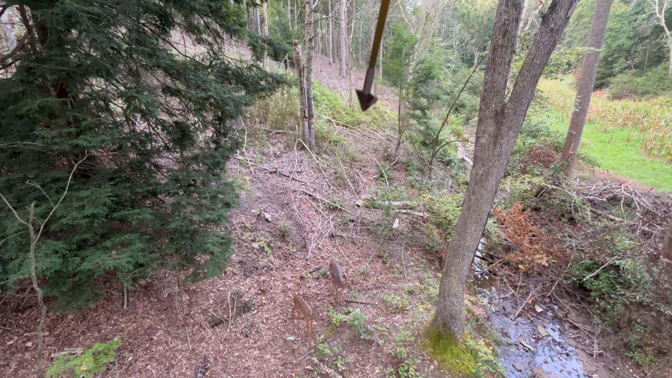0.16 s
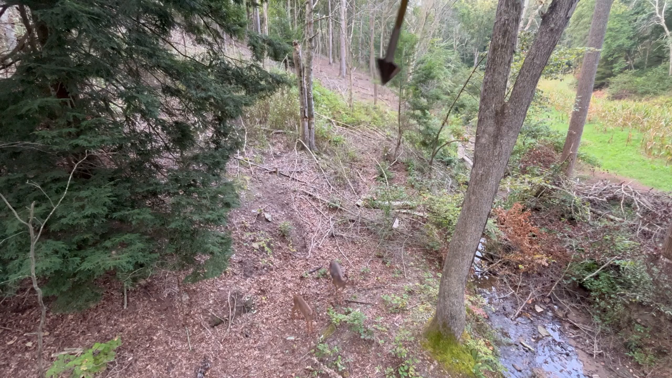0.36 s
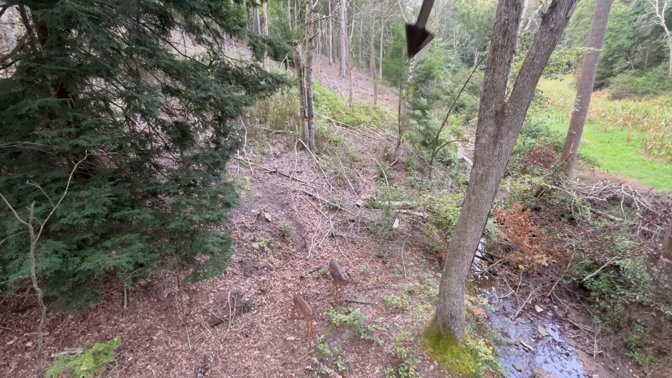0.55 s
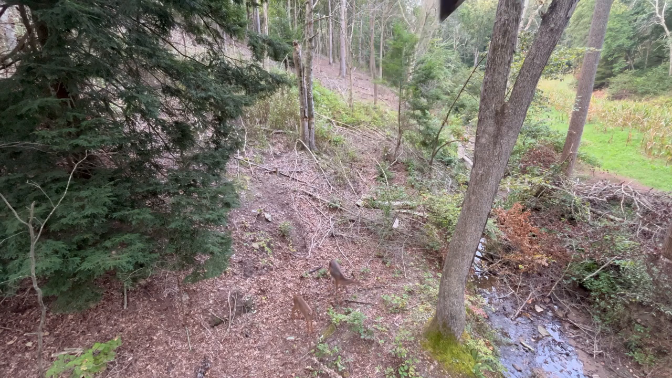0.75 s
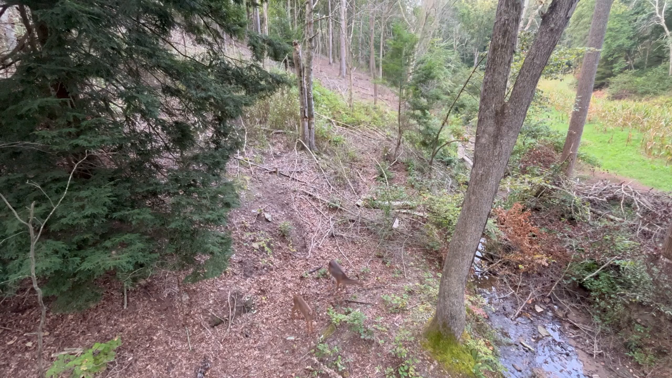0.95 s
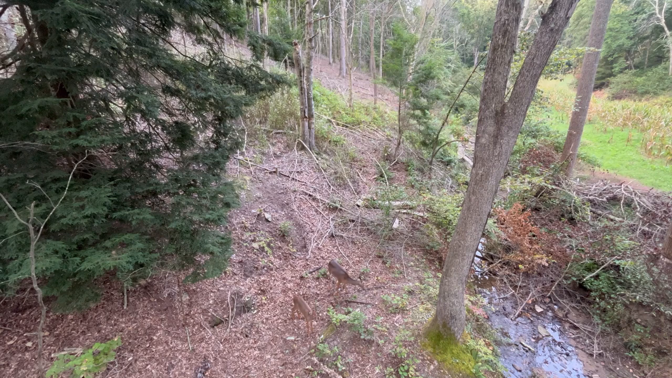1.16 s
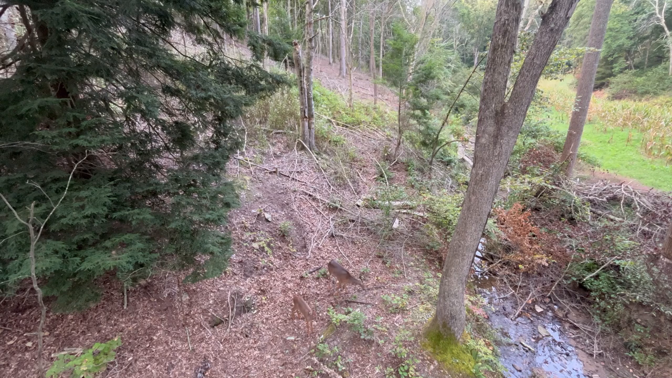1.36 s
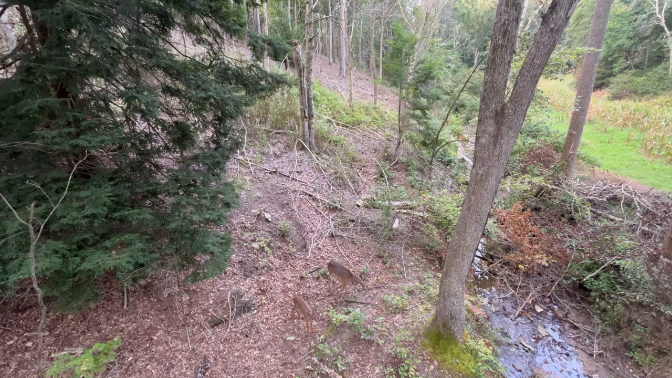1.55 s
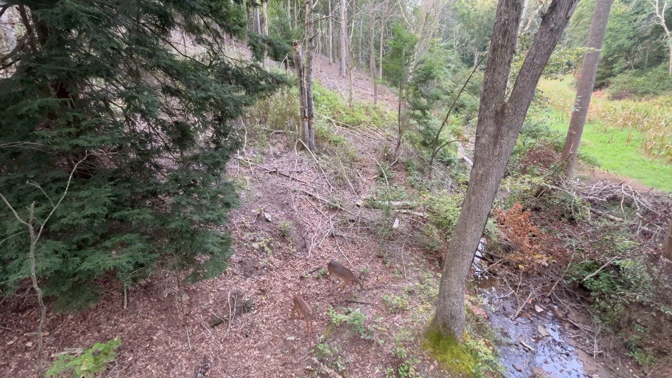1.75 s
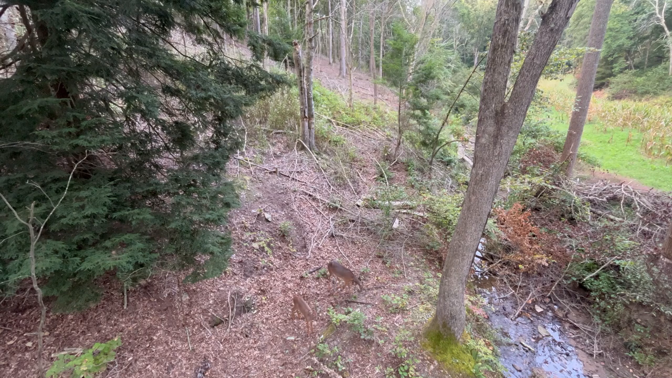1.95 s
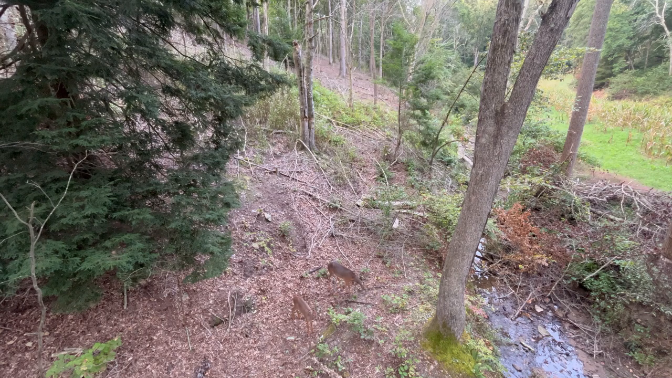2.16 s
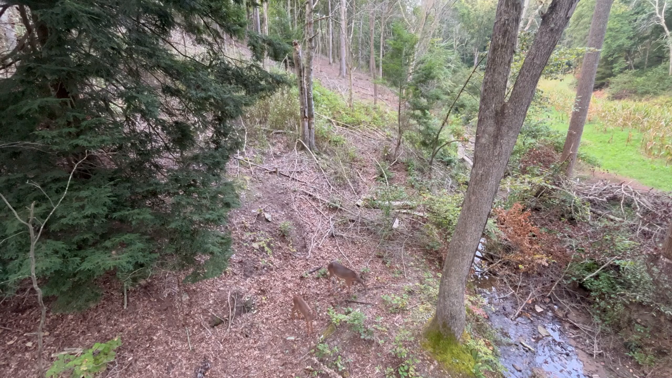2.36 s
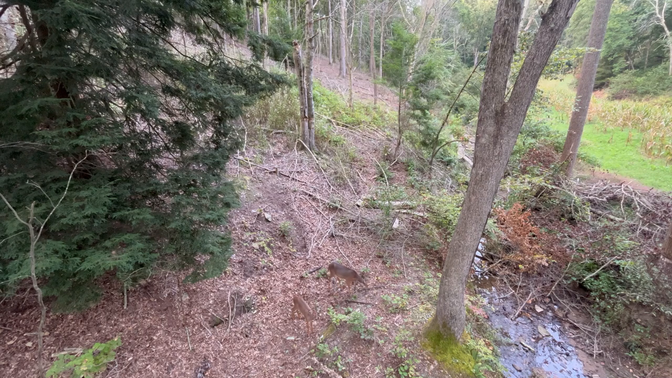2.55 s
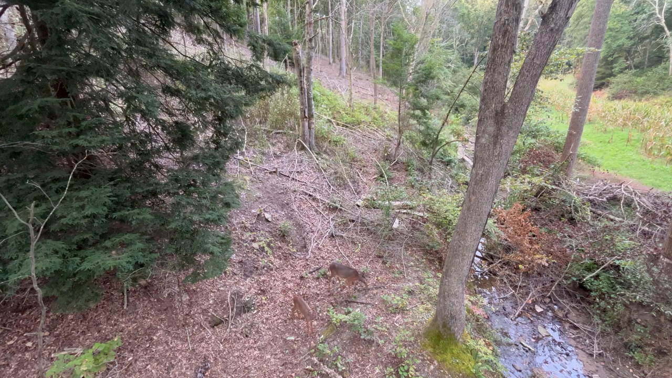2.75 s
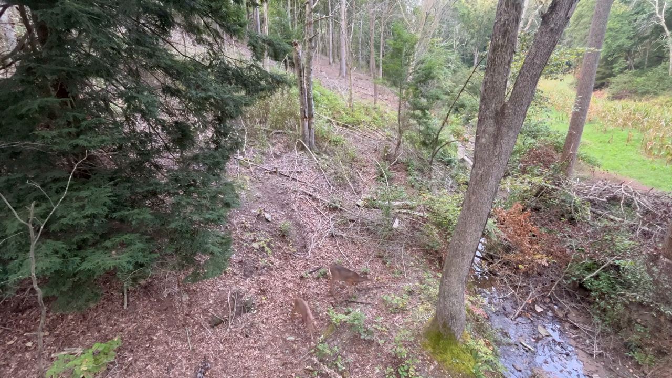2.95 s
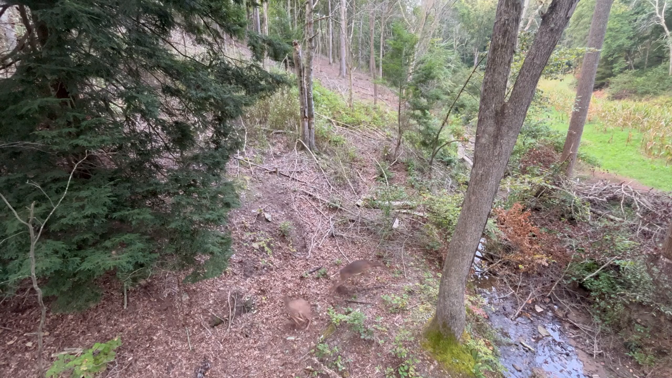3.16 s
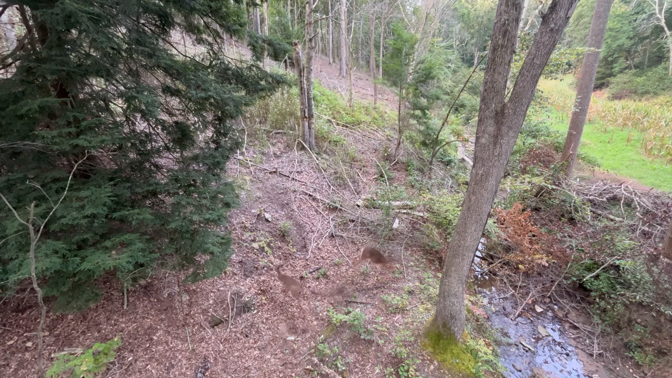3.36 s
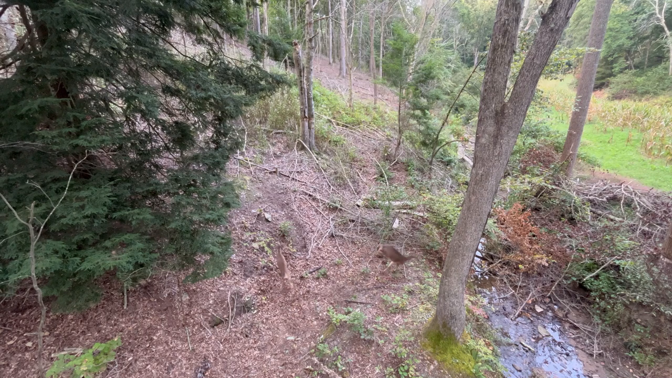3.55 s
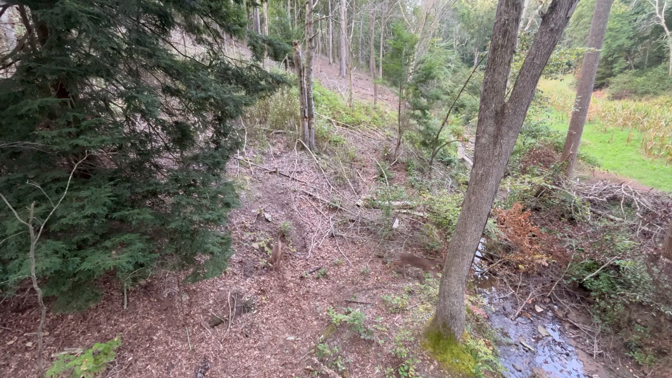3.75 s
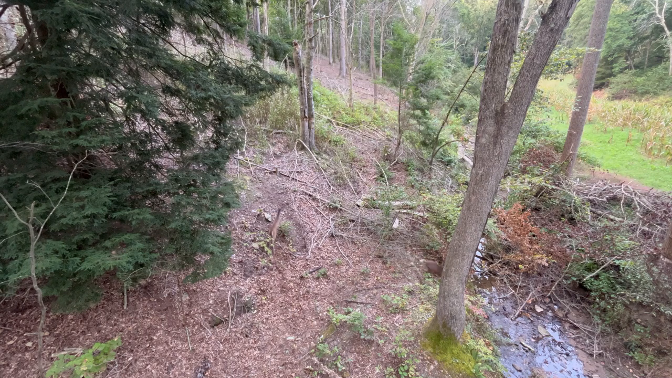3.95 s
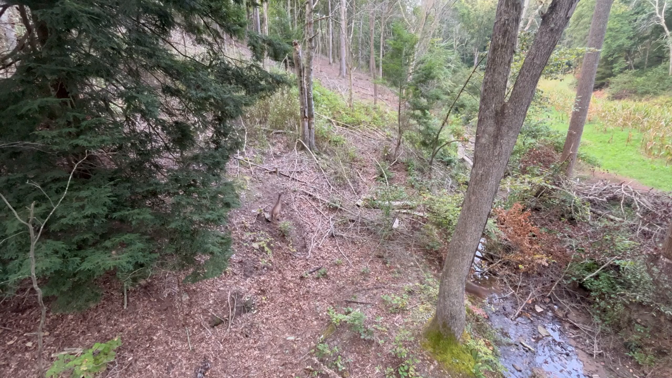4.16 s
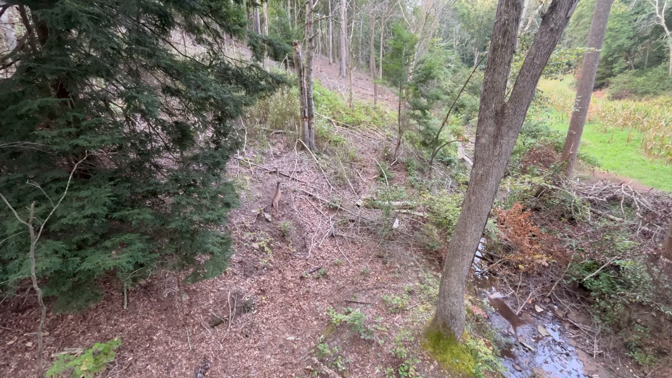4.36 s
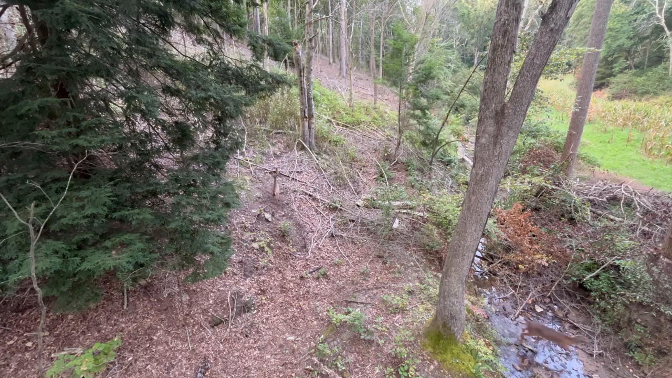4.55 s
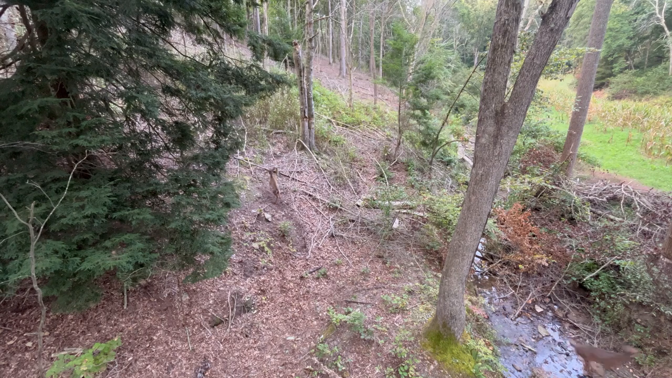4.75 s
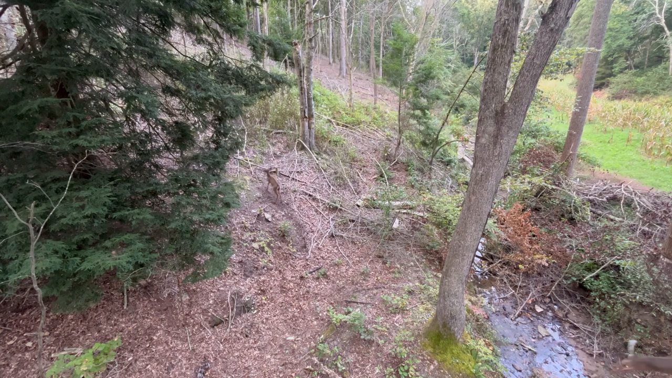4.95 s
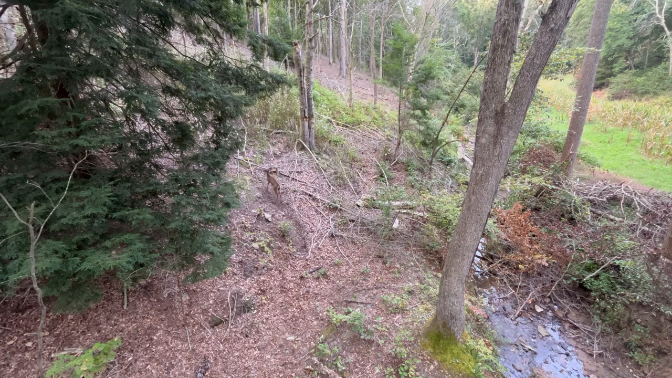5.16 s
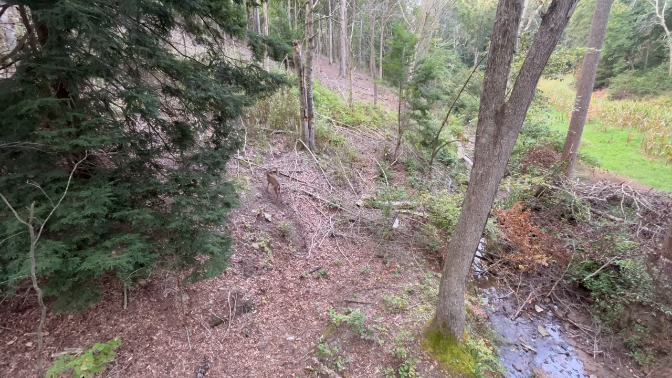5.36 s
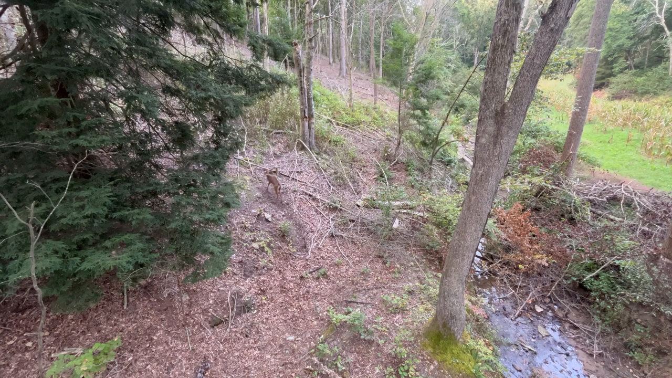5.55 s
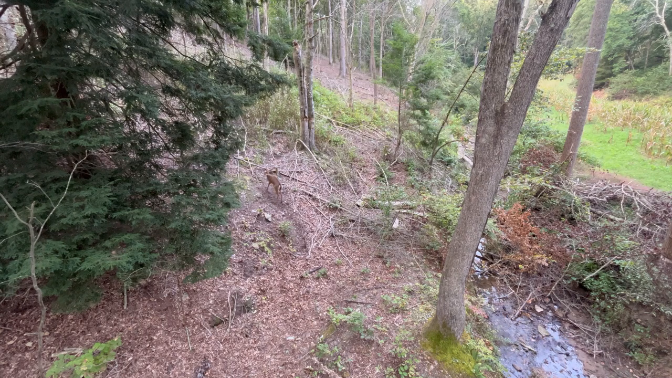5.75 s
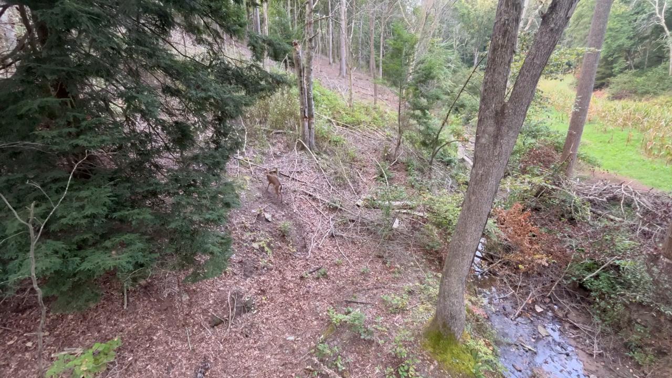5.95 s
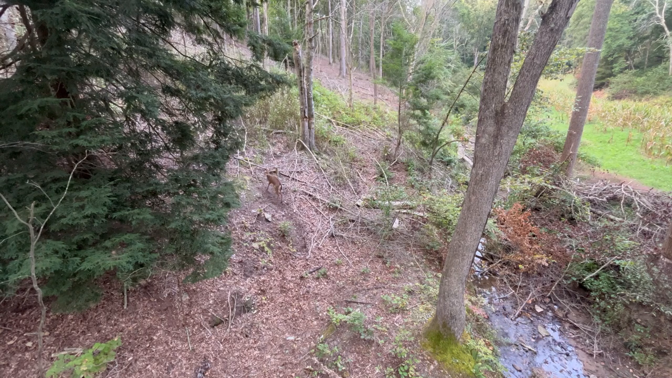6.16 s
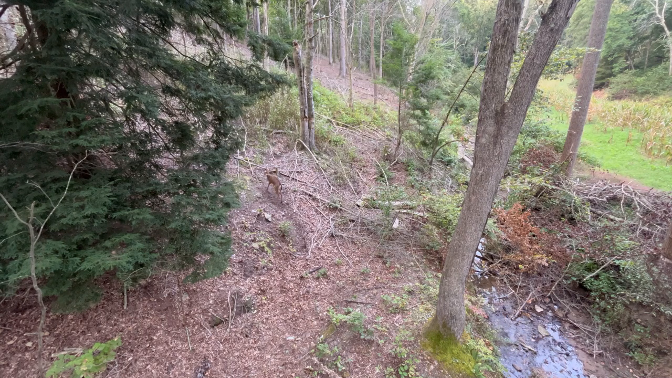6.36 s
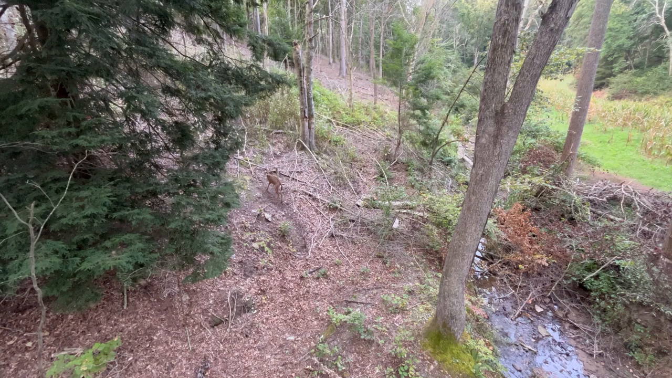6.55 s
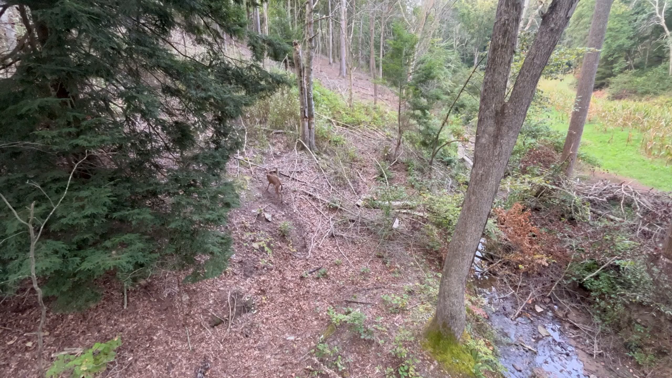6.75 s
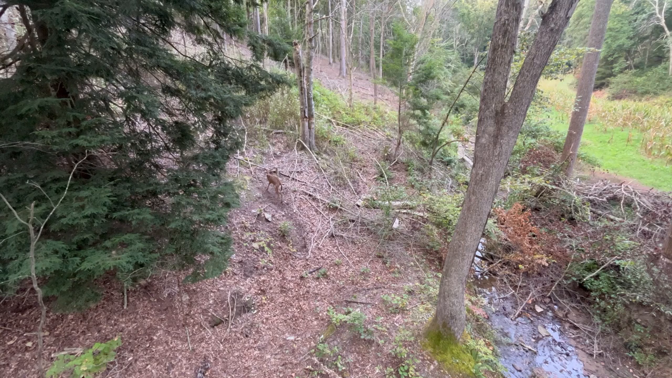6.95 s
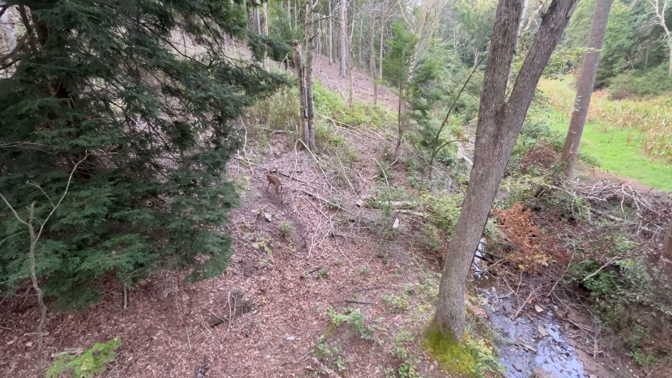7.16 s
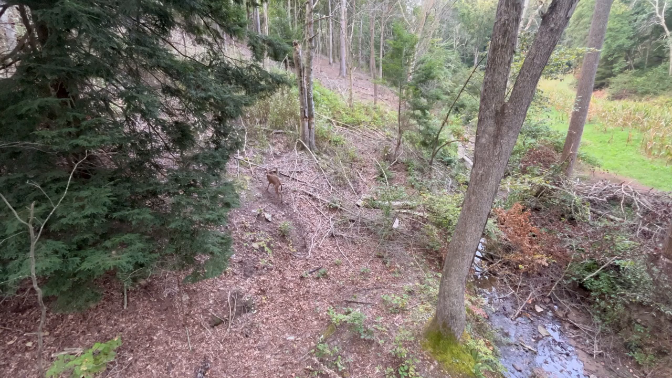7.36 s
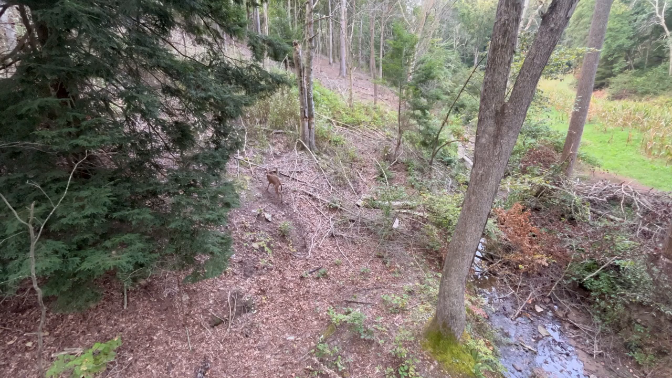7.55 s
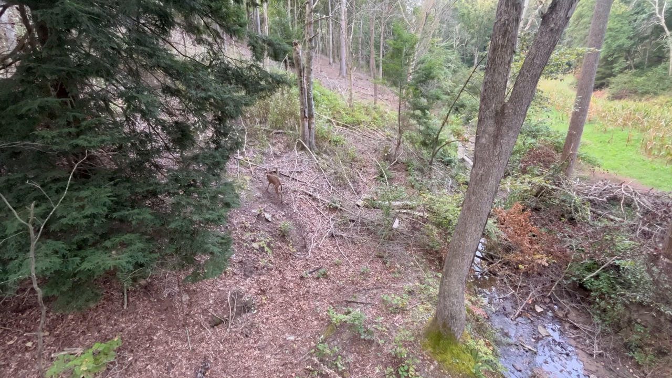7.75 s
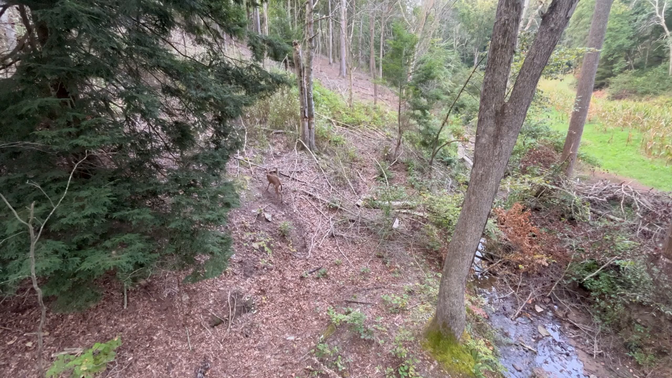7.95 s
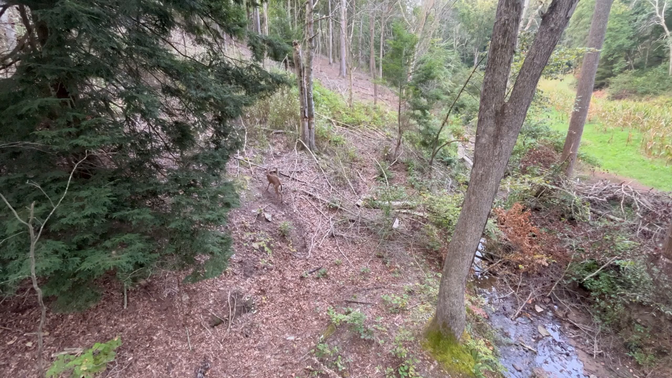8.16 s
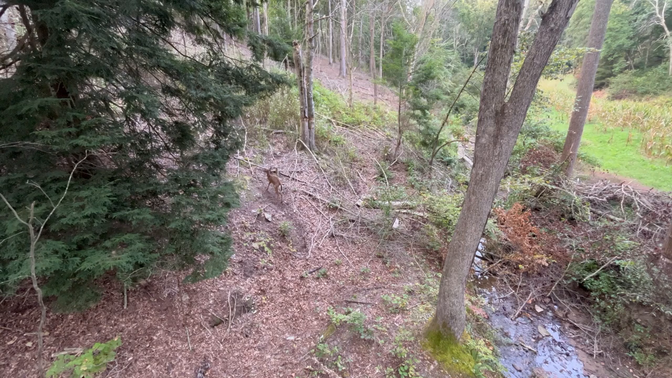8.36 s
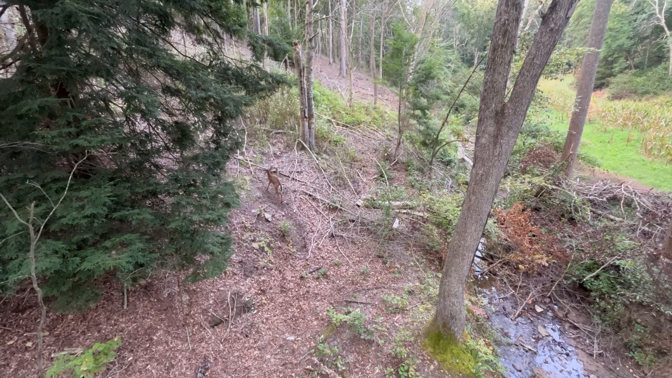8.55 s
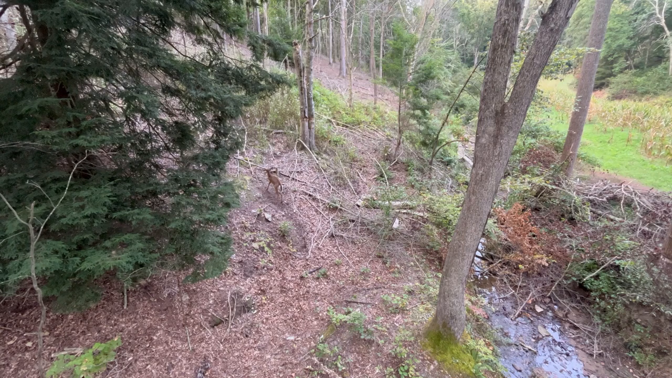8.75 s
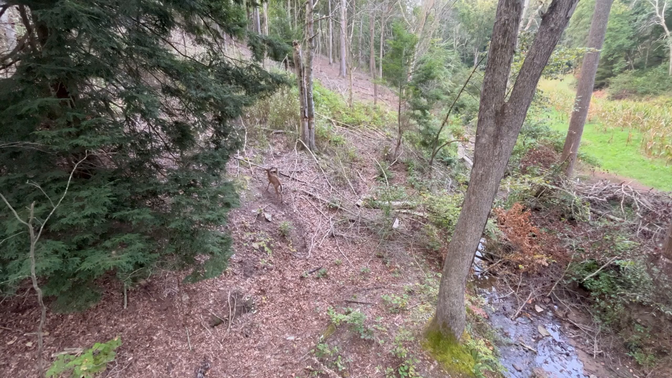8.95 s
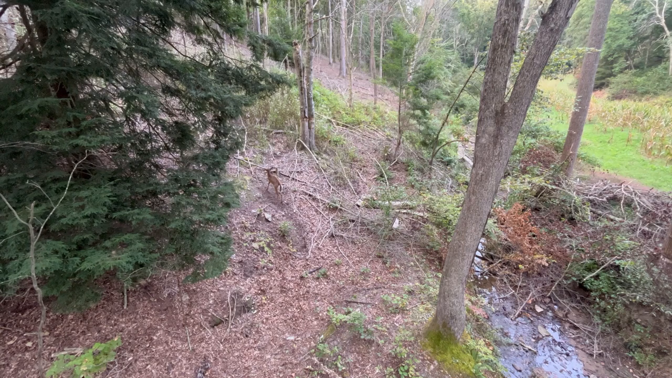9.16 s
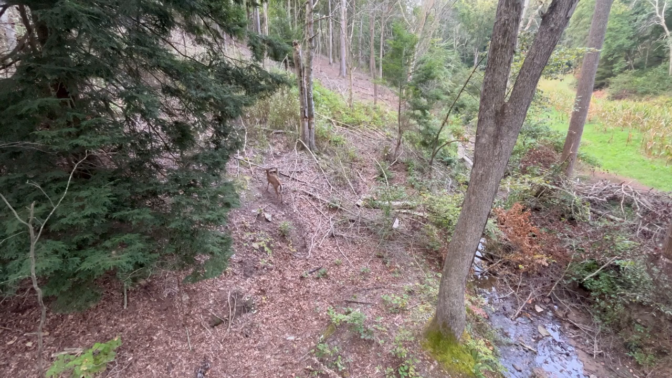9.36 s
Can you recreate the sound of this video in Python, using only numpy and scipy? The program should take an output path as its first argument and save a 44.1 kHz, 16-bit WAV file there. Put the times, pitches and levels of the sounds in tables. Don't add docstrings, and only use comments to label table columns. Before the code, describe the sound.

Open woodland heard from a tree stand, in stereo, with a near cricket's short falling chirps, far crickets trilling continuously and a soft distant hum. In the first 2.5 seconds there are small shuffles and dry ticks near the microphone, plus faint bird notes. At about 2.75 a bow is shot: a very loud, sharp cluster of string slap and hard clacks, loose rattle and a short low thump, over within about 0.15 seconds, with slight woodland echo. From 2.86 to 5.3 a deer bounds away, dull hoof thuds and crisp leaf crunches with bright twig snaps, quick at first, then more spaced and distant. Leaves settle; at about 5.75 to 6.0 it gives one short, airy nasal snort. From 6.3 to the end, at about 9.4, faint irregular steps, twig ticks and soft hollow knocks continue far off under the crickets; a tiny high bird peep comes near 9.35.

```python
import sys
import numpy as np
from scipy import signal
from scipy.fft import rfft, irfft, next_fast_len
from scipy.io import wavfile
from scipy.ndimage import uniform_filter1d, map_coordinates

SR = 44100
rng = np.random.default_rng(int(sys.argv[2]) if len(sys.argv) > 2 else 0)


def unload_wav(signal):
    wavfile.write(
        sys.argv[1],
        SR,
        np.round(np.clip(np.atleast_2d(signal).T, -1, 1) * 32767).astype(np.int16),
    )


def ratio(d):
    e = np.asarray(d, float) / 20
    return 10 ** e


N = 414540


def evened(x):
    return x / np.sqrt(np.mean(x ** 2) + 1e-20)


def read(points, hz):
    f, value = np.transpose(points)
    return np.interp(np.log(hz + 1), np.log(f + 1), value)


def column(rows, index):
    return np.interp(np.arange(N) / SR, np.array(rows)[:, 0], np.array(rows)[:, index])


def add(mix, s, sound):
    part = mix[..., round(s * SR):][..., :sound.shape[-1]]
    part += sound[..., :part.shape[-1]]


def sides(pan_db):
    return ratio(np.array([.5 * pan_db, -.5 * pan_db]))


def colour(x, gain_db):
    size = next_fast_len(N)
    return irfft(rfft(x, size) * ratio(gain_db(np.fft.rfftfreq(size, 1 / SR))), size)[..., :N]


def resonate(x, hz, width):
    turn = np.exp(2j * np.pi * np.cumsum(hz * np.ones(x.shape[-1])) / SR)
    r = np.exp(-np.pi * width / SR)
    return 2 * (turn * signal.lfilter([1 - r], [1, -r], x / turn)).real


def ring(t, hz, t60):
    return np.sin(2 * np.pi * hz * t) * ratio(-60 * t / max(t60, .003))


def crackle(per_s, spread_db, hiss, alike):
    luck = rng.random((3, N)) * SR / per_s
    air = rng.standard_normal((3, N))
    clicks = np.zeros((3, N))
    clicks[luck < 1] = ratio(spread_db * np.minimum(-np.log(luck[luck < 1] + 1e-9), 5))
    x = evened(clicks * np.sign(air[:, ::-1])) + hiss * air
    alike = np.clip(alike, 0, 1)
    return evened(np.sqrt(alike) * x[0] + np.sqrt(1 - alike) * x[1:])


def patchy(x, depth_db):
    z = signal.stft(x, nperseg=256)[2]
    field = uniform_filter1d(uniform_filter1d(rng.standard_normal(z.shape[1:]), 4, 0), 8, 1)
    return evened(signal.istft(z * ratio(depth_db * evened(field)), nperseg=256)[1][:, :N])


# (time [s], peak [dB], pitch [Hz], t60 [s])
SLAPS = [(2.741, -45, 4240, 0.09), (2.747, -38, 2480, .05), (2.7516, -28.5, 1260, .05),
         (2.7567, -11.5, 4060, 0.034), (2.76, -12, 2800, 0.027), (2.764, -6.5, 1180, .02),
         (2.769, -10.5, 3330, .02), (2.774, -10.5, 5100, 0.022), (2.778, -11, 5000, 0.024),
         (2.7872, -8, 3930, 0.02), (2.795, -21.5, 2200, .03), (2.798, -21, 2280, .04),
         (2.806, -19, 3420, .04), (2.817, -25.5, 3400, 0.032), (2.829, -25, 3430, 0.046)]
# (time [s], level [dB], pitch [Hz], t60 [s],
# sign of first swing)
THUMPS = [(2.76, -15, 466, 0.051, -1), (2.764, -22, 840, .04, 1), (2.759, -17.5, 640, 0.054, 1),
          (2.762, -26, 336, .09, 1), (2.78, -12.5, 126.8, 0.021, -1), (2.781, -21.5, 67, 0.05, 1),
          (2.797, -22.5, 449, 0.1, 1), (2.835, -36.5, 455, .08, 1), (2.804, -21, 51, 0.082, -1),
          (2.812, -14, 64, 0.067, 1), (2.831, -29, 92.4, 0.37, 1), (2.8, -46, 2400, 0.29, 1),
          (5.771, -41.5, 185, 0.045, 1), (2.7828, -12.5, 140, .03, 1), (2.8135, -22, 94, 0.068, 1)]
# (frequency [Hz], density [dB per Hz])
RATTLE = [(180, -39.5), (300, -4.5), (574, -12), (842, -4.5), (1810, -11.5), (2500, -9), (3400, -10),
          (4300, -14.5), (6200, -16), (8800, -17.5), (11000, -28.5), (16000, -30)]


def bow():
    shake, out = np.zeros((2, 2, N))
    t = np.arange(round(.5 * SR)) / SR
    pan_db = -7
    for s, db, hz, t60 in SLAPS:
        slap = ring(t, hz, t60 * 0.75) * (1 - np.exp(-t / .0004))
        add(out, s, ratio(db - 10.5) * np.outer(sides(pan_db), slap))
        jolt = ratio(db - 9.0 - 60 * t / max(t60, .005)) * (1 - np.exp(-t / 0.00069))
        add(shake, s, np.outer(sides(pan_db), jolt) ** 2)
    for s, db, hz, t60, sign in THUMPS:
        thump = np.sign(sign) * ratio(db) * ring(t, hz, t60)
        left, right = np.outer(sides(-6. if hz < 200 else -1.), thump)
        add(out[0], s + 0.00048, left)
        add(out[1], s, right)
    loose = crackle(per_s=3100, spread_db=0.0, hiss=0.57, alike=0.72)
    loose = colour(loose, lambda hz: read(RATTLE, hz))
    return out + np.sqrt(shake) * patchy(loose, depth_db=3.0)


# (time [s], peak [dB], treble [dB], thud [dB], t60 [s])
BOUNDS = [(2.86, -35.5, 0, -30.5, 0.097), (2.982, -39.5, 9, -32.5, 0.12), (3.01, -38.5, 2, -32.5, 0.15),
          (3.051, -36.5, 1.5, -37, 0.2), (3.065, -34, -9, -38, 0.083), (3.132, -43.5, 13.5, -37.5, 0.14),
          (3.302, -37.5, 10.5, -53, 0.041), (3.516, -43, 9.5, -44, 0.14), (3.603, -39, 8.5, -67, 0.25),
          (3.71, -39.5, 7, -69, 0.37), (3.789, -43.5, 2, -46, 0.36), (3.972, -41, -4, -52, 0.34),
          (4.09, -47, 9.5, -65, 0.092), (4.269, -44.5, 4.5, -52, 0.21), (4.432, -33, -12, -43, 0.1),
          (4.578, -41.5, 1.5, -52, 0.16), (4.708, -35, -2, -58, 0.086), (4.865, -39, -8, -41, 0.13),
          (5.042, -45.5, 9, -63, 0.17), (5.137, -45, 3, -72, 0.23), (5.309, -40.5, 2.5, -44, 0.23)]
# (time [s], peak [dB], treble [dB], t60 [s])
SHUFFLES = [
    (0.066, -44.5, -2, 0.091),
    (0.211, -64, 19, 0.035),
    (0.814, -69, -2, 0.22),
    (1.276, -48.5, -4, 0.1),
    (1.396, -61.5, -1, 0.48),
    (1.756, -55, -5, 0.2),
    (1.786, -53, -2, 0.15),
    (2.053, -73.5, -25, 0.34),
]
# (time [s], peak [dB], treble [dB])
WALK = [(6.272, -46, -1.5), (6.386, -52, -11), (6.581, -55.5, -10), (6.7, -58.5, -9), (6.745, -54, 3),
        (6.935, -61.5, -9), (7.204, -57, 8), (7.33, -60, -9), (7.472, -65.5, -9.5), (7.613, -62, -16),
        (7.81, -62, -12), (7.841, -48, 10.5), (8.08, -60, -13.5), (8.28, -65, -13), (8.499, -58, 5.5),
        (8.75, -58, -14.5), (8.795, -52, 5.5), (9.01, -62.5, -13.5), (9.281, -63, -22)]
# (time [s], level [dB])
RUSTLE = [
    (2.76, -75),
    (2.94, -61),
    (3.15, -57),
    (5.23, -69.5),
    (5.46, -71),
    (5.7, -83.5),
]
# (frequency [Hz], density [dB per Hz])
LEAVES = [(180, -35.5), (330, -7.5), (530, -6), (1000, -3), (2200, -3.5), (3400, -1.5), (9000, -4),
          (16000, -4)]
# (frequency [Hz], density [dB per Hz])
SOIL = [(21, -39.5), (35, -4), (91, 5), (226, -9), (351, -11), (600, -14.5), (780, -47.5), (1320, -120)]
# (time [s], lag of left port [samples], gain above 10 kHz [dB], left-right
# [dB])
LAG = [
    (0, 5, -9, 1),
    (2.9, 5.24, 3, 2.5),
    (3.9, 5.26, 6, 4.5),
    (4.4, 13.1, 3.5, 4.5),
    (5, 14, 1, 2),
    (5.7, 21.5, 0, 1.5),
    (9.4, 23, -20, 1.5),
]


def leaves():
    walk_t60, walk_thud_db, shuffle_thud_db = 0.16, -54, -53.5
    body, treble, thud = np.zeros((3, 2, N))
    t = np.arange(round(.4 * SR)) / SR
    steps = BOUNDS + [(s, db, treble_db, shuffle_thud_db, t60) for s, db, treble_db, t60 in SHUFFLES]
    steps += [(*step, walk_thud_db, walk_t60) for step in WALK]
    pan_db = column(LAG, 3)
    for s, db, treble_db, thud_db, t60 in steps:
        rise = (1 - np.exp(-t / (0.11 * t60 + 0.00062))) ** 2
        decay = ratio(db + 2.5 - 60 * t / max(t60, .01))
        crush = np.outer(sides(pan_db[round(s * SR)]), decay * rise)
        s -= 0.076 * t60
        add(body, s, crush ** 2)
        add(treble, s, (crush * ratio(treble_db)) ** 2)
        add(thud, s, (crush * ratio(thud_db - db + 0.5)) ** 2)
    flight = np.zeros(N)
    add(flight, RUSTLE[0][0], signal.windows.tukey(round((RUSTLE[-1][0] - RUSTLE[0][0]) * SR), .08))
    bed = flight * ratio(column(RUSTLE, 1)) * sides(pan_db)
    body += bed ** 2
    treble += (bed * ratio(5.5)) ** 2
    thud += (bed * ratio(-9.5)) ** 2

    def split(hz):
        return np.clip(30 * np.log2(hz / 5200 + 1e-3), -60, 60)

    grains = patchy(crackle(per_s=2000, spread_db=3.8, hiss=.45, alike=.5), depth_db=2.5)
    large = colour(grains, lambda hz: read(LEAVES, hz) - np.maximum(split(hz), 0))
    grains = patchy(crackle(per_s=1700, spread_db=3.5, hiss=0.25, alike=0.46), depth_db=3.0)
    small = colour(grains, lambda hz: read(LEAVES, hz) + np.minimum(split(hz), 0))
    grains = crackle(per_s=540, spread_db=2.0, hiss=0.24, alike=.9)
    soil = colour(grains, lambda hz: read(SOIL, hz))
    out = np.sqrt(body) * evened(large) * ratio(1.5)
    out += np.sqrt(treble) * evened(small)
    return out + np.sqrt(thud) * evened(soil)


# (time [s], blow [dB])
SNORT = [
    (5.742, -62.5),
    (5.765, -45),
    (5.79, -40),
    (5.81, -35),
    (5.86, -32),
    (5.9, -36),
    (5.95, -38.5),
    (6.0, -52.5),
    (6.06, -75),
]
# (frequency [Hz], density [dB per Hz])
NOSE = [(150, -16.5), (500, -14), (900, -3), (1500, -1), (2800, -4), (4000, -4.5), (5100, -4), (6000, -8.5),
        (9000, -14.5), (16000, -24.5)]
# (pitch [Hz], width [Hz], level [dB])
WHISTLE = [(1960, 340, 0), (2280, 420, -3.5)]
# (time [s], resonance [Hz], level [dB])
THROAT = [
    (5.76, 676, -13),
    (5.79, 870, -6.5),
    (5.83, 1100, -10),
    (5.875, 1060, -6.5),
    (5.905, 820, -5.5),
    (5.95, 750, -6.5),
    (5.98, 570, -3),
    (6.02, 300, -6),
]


def snort():
    on = np.zeros(N)
    add(on, SNORT[0][0], signal.windows.tukey(round((SNORT[-1][0] - SNORT[0][0]) * SR), .06))
    air = crackle(per_s=3000, spread_db=-2.5, hiss=1.6, alike=0.68)
    wide = crackle(per_s=3000, spread_db=3.0, hiss=1.6, alike=0.085)
    hiss = colour(air, lambda hz: read(NOSE, hz) - 40 * (hz > 5500))
    hiss = hiss + colour(wide, lambda hz: read(NOSE, hz) - 40 * (hz <= 5500))
    whistle = sum(ratio(db) * resonate(resonate(air, hz, width), hz, width) for hz, width, db in WHISTLE)
    throat_hz = column(THROAT, 1)
    ridge = resonate(resonate(air, throat_hz, 220), throat_hz, 220)
    blow_db = column(SNORT, 1)
    relaxing_s = np.clip(np.arange(N) / SR - 5.895, 0, 1)
    whistle_db = -6 + .5 * (blow_db - blow_db.max()) - 400 * relaxing_s
    voice = patchy(hiss, depth_db=2.0) + ratio(whistle_db) * evened(whistle)
    voice = voice + ratio(column(THROAT, 2)) * evened(ridge)
    return on * ratio(blow_db) * voice


# (time [s], peak [dB], pitch [Hz], tick treble [dB])
TWIGS = [(0.067, -42, 1800, -54), (0.178, -59, 3930, -58), (0.344, -38.5, 666, -44), (0.93, -57, 1500, -54),
         (2.569, -69, 3870, -63.5), (2.865, -36, 1159, -55), (2.879, -30, 3040, -46),
         (2.898, -31, 783, -54.5), (2.941, -37, 2500, -51.5), (2.957, -47, 689, -45),
         (2.981, -41, 897.6, -40), (3.011, -32.5, 740, -46.5), (3.102, -33.5, 1970, -47.5),
         (3.132, -39, 3400, -37), (3.289, -47, 4000, -46), (3.428, -41.5, 1830, -61),
         (3.902, -58, 3050, -46.5), (3.972, -36, 3200, -56), (4.434, -36, 2280, -52),
         (4.702, -28, 2950, -57), (4.871, -32.5, 2410, -49), (4.943, -42, 5470, -50.5),
         (5.018, -41.5, 2720, -64), (5.037, -33, 4660, -49), (5.14, -39, 2130, -57),
         (7.855, -39, 4550, -47), (8.467, -50, 2292, -47.5), (8.799, -49, 3750, -55),
         (9.362, -50, 4030, -67)]
# (time [s], peak [dB], pitch
# [Hz])
KNOCKS = [(1.79, -47.5, 1140), (2.055, -56, 726), (2.98, -35, 550), (3.068, -36, 910), (4.698, -43, 734),
          (6.275, -57.5, 2190), (6.58, -63.5, 2200), (6.75, -60, 1096), (7.2, -64, 2260),
          (7.485, -68, 2255), (8.055, -56, 720), (8.1, -63, 790), (8.262, -54, 802), (8.495, -54, 724),
          (8.75, -53.5, 762), (8.999, -56, 770), (9.292, -56, 630)]


def twigs():
    out, cracks, ticks = np.zeros((3, 2, N))
    t = np.arange(round(.12 * SR)) / SR
    pan_db, t60, knock_pan_db = -3.5, 0.026, 7.5
    for s, db, hz, tick_db in TWIGS:
        modes = ring(t, hz, t60) + ratio(-8) * ring(t, 2.2 * hz, t60)
        add(out, s, ratio(db - 10) * np.outer(sides(pan_db), modes))
        add(cracks, s, ratio(db - 7) * np.outer(sides(pan_db + 3), ratio(-60 * t / (.65 * t60))))
        add(ticks, s, ratio(tick_db + 9.5) * np.outer(sides(pan_db + 7.0), ratio(-60 * t / (.5 * t60))))
    for (s, db, hz), grit in zip(KNOCKS, rng.standard_normal((len(KNOCKS), len(t)))):
        hollow = evened(resonate(resonate(grit, hz, 380. if s < 4 else 200.), hz, 380.))
        knock_t60 = 0.059 + 0.012 * (s - BOUNDS[0][0])
        rise_s = 0.008 + 0.0063 * max(s - SNORT[-1][0], 0)
        knock = ratio(db - 60 * t / knock_t60) * hollow * (1 - np.exp(-t / rise_s))
        add(out, s, np.outer(sides(knock_pan_db), knock))
    splinters = crackle(per_s=9000, spread_db=4.0, hiss=1.4, alike=0.11)
    band = signal.butter(2, [700, 6000], "band", fs=SR, output="sos")
    wood = evened(signal.sosfilt(band, splinters))
    table = np.array(TWIGS)
    latest = np.searchsorted(table[:, 0], np.arange(N) / SR, "right") - 1
    pitch = table[np.maximum(latest, 0), 2]
    toned = .5 * wood + .85 * evened(resonate(splinters, pitch, 1500.))
    bright = evened(np.diff(splinters - wood * np.std(splinters) / 2, prepend=0))
    return out + cracks * toned + ticks * bright


# (time [s], peak [dB], pitch [Hz], t60 [s])
TICKS = [(2.7575, -20, 7560, 0.0079), (2.7692, -16, 6330, 0.0099), (2.7694, -18.5, 8320, 0.013),
         (2.7775, -19, 7400, 0.0096), (2.7695, -20.5, 3307, 0.11), (2.764, -21.5, 1690, .05),
         (2.777, -23, 4760, 0.044), (2.7698, -27.5, 10200, 0.0058), (2.792, -22, 2097, .025),
         (2.797, -21, 2190, .04), (2.762, -21, 792, 0.13), (2.788, -24, 6310, 0.01),
         (2.7878, -7.5, 3788, 0.012), (2.829, -30.5, 6730, 0.0091), (2.852, -36, 4300, 0.02),
         (2.8587, -31.5, 1171, 0.021), (2.866, -37.5, 6990, 0.008), (2.87, -35, 2928, .012),
         (2.8806, -31.5, 4820, 0.023), (2.881, -33.5, 7200, 0.012), (2.896, -33.5, 3900, 0.0091),
         (2.898, -39.5, 7000, .008), (2.903, -49, 2260, .2), (2.9565, -36.5, 4650, 0.012),
         (2.958, -36, 765, 0.026), (2.985, -40, 4387, 0.036)]
# (time [s], peak [dB], pitch [Hz], t60 [s])
PINGS = [(.813, -62, 1500, 0.018), (1.395, -56, 1000, 0.024), (2.982, -33.5, 296, 0.078),
         (2.99, -38.5, 955, 0.036), (2.996, -31, 93, 0.09), (3.009, -34, 2900, .01),
         (3.025, -39, 2600, .01), (3.051, -39.5, 646, 0.031), (3.062, -40, 125, 0.074),
         (3.082, -35, 150, 0.046), (3.131, -41, 472, 0.03), (3.1311, -30, 6620, .015),
         (3.2543, -48.5, 730, .03), (3.2882, -39, 5510, 0.0091), (3.4269, -45, 1870, 0.0078),
         (3.4269, -36.5, 5600, 0.0087), (3.52, -47, 6300, .06), (3.6075, -47, 7450, .06),
         (3.6195, -41, 2180, 0.057), (3.709, -52, 903, 0.033), (3.78, -40, 7600, 0.036),
         (3.788, -45.5, 542, .06), (3.8, -46, 260, 0.072), (3.915, -47.5, 237, .06),
         (3.9008, -44, 5190, .008), (3.9732, -38, 4460, 0.028), (3.974, -30.5, 2990, 0.028),
         (4.3553, -46, 4510, 0.017), (4.4341, -42, 2900, .02), (4.436, -30, 1500, 0.013),
         (4.5733, -40.5, 3330, 0.0086), (4.5853, -43, 4200, .02), (4.597, -48, 2620, 0.01),
         (4.701, -30, 6510, 0.023), (4.706, -41, 4170, 0.094), (4.708, -42, 1460, 0.094),
         (4.7479, -45, 3910, .025), (4.8711, -41, 2630, 0.059), (4.872, -44.5, 185, 0.063),
         (4.943, -44, 5790, .008), (5.0377, -30, 4940, 0.028), (5.139, -40.5, 1152, 0.038),
         (5.3171, -50, 7900, .02), (5.3211, -42, 4890, 0.043), (5.772, -46.5, 5000, 0.029),
         (6.008, -48, 290, 0.077), (6.054, -52, 2110, .015), (6.2809, -50, 4120, 0.016),
         (7.8409, -44, 4810, .015), (7.8548, -37.5, 5290, 0.014), (8.607, -62, 2950, 0.021),
         (8.6969, -49.5, 4860, .01),
         (.066, -43, 400, .03), (.343, -50, 450, 0.025), (2.981, -43, 10800, .006),
          (3.066, -37, 6500, 0.0092), (3.132, -35, 9000, .008), (3.2546, -47, 8270, .008),
          (3.288, -42, 10500, .005), (3.305, -31, 10100, 0.011), (3.6048, -45, 8850, .01),
          (3.709, -44, 9630, .01), (3.9006, -42, 9900, .006), (4.876, -47, 420, .04), (4.9, -51, 450, .03),
          (8.645, -67, 2206, .04), (6.274, -50, 175, .08), (5.803, -47, 130, .05), (9.32, -64, 1720, .06)]


def pings(rows, pan_db, late_s):
    out = np.zeros((2, N))
    t = np.arange(round(.2 * SR)) / SR
    for (s, db, hz, t60), apart in zip(rows, rng.uniform(.94, 1.2, (len(rows), 2))):
        pair = np.array([ring(t, hz, t60) + .5 * ring(t, hz * a, t60) for a in apart])
        rough = uniform_filter1d(rng.standard_normal(pair.shape), size=max(round(3 * SR / hz), 2), axis=1)
        grit = 1 + 0.49 * evened(rough)
        left, right = ratio(db - 3.0) * sides(pan_db)[:, None] * pair * grit * (1 - np.exp(-t * hz * 2))
        add(out[0], s + late_s, left)
        add(out[1], s, right)
    return out


def bearing(x):
    top = signal.sosfiltfilt(signal.butter(4, 10200, "high", fs=SR, output="sos"), x)
    x = x + (ratio(column(LAG, 2)) - 1) * top
    late = map_coordinates(x[0], [np.arange(N) - column(LAG, 1)], order=3)
    return np.array([late, x[1]])


# (frequency [Hz], t60 [s])
TREES = [(100, 0.23), (1000, 0.85), (4000, 0.66), (9000, 0.88), (13000, 0.59)]


def trees(x):
    taps = np.zeros((2, SR))
    at = np.arange(400, SR - 20, 20) + rng.integers(0, 20, (2, (SR - 401) // 20))
    np.put_along_axis(taps, at, rng.choice([-1., 1.], at.shape), 1)
    hz, t, z = signal.stft(taps, SR, nperseg=256)
    tail = signal.istft(z * ratio(-60 * t / read(TREES, hz)[:, None]), SR, nperseg=256)[1]
    return signal.fftconvolve(x, tail / np.linalg.norm(tail[0]), axes=1)[:, :N]


# (first pulse [s], last pulse [s], pulses [count])
SONGS = [(.1261, .3147, 4), (.829, .942, 3), (1.416, 1.5888, 4), (2.154, 2.332, 4), (4.28, 4.455, 4),
         (5.472, 5.653, 4), (6.5315, 6.5844, 2), (7.5035, 7.6261, 3), (8.32, 8.5018, 4), (8.955, 9.1277, 4)]
# (pitch [Hz], level [dB])
CHORUS = [(4120, -71), (4680, -68), (4880, -65), (5100, -67)]


def crickets():
    slowing, chirp_db, swell_db = 1.16, -57.5, 3.5
    out = np.zeros((2, N))
    t = np.arange(round(0.021 * SR)) / SR
    pulse = np.sin(2 * np.pi * (4530 * t - 6500 * t ** 2)) * np.hanning(len(t))
    for first, last, count in SONGS:
        for along in np.linspace(1, 0, count):
            s = first + (last - first) * along ** slowing - .007
            db = chirp_db + 1.1 * rng.standard_normal() - swell_db * (-0.5 - along)
            add(out, s, ratio(db) * np.outer(sides(-0.5), pulse))
    t = np.arange(round(0.035 * SR)) / SR
    for hz, db in CHORUS:
        trill = np.sin(2 * np.pi * (hz - 40) * t + 2 * np.pi * 600 * t ** 2) * np.hanning(len(t))
        starts = (rng.random((2, N)) < 9. / SR) * ratio(1.4 * rng.standard_normal((2, N)))
        out += ratio(db) * signal.oaconvolve(starts + 1.0 * starts[::-1], trill[None])[:, :N]
    return out


# (time [s], pitch [Hz], level [dB])
PEEP = [
    (9.3, 8250, -88),
    (9.345, 9250, -84),
    (9.365, 9560, -73),
    (9.4, 9550, -84),
]
# (time [s], length [s], pitch from [Hz], pitch to [Hz], level [dB])
NOTES = [
    (.208, .02, 2750, 2750, -62),
    (.208, .02, 3450, 3450, -61),
    (.2, .09, 2300, 2700, -72),
    (1.42, .22, 3450, 3200, -73),
    (.1, 1.7, 3250, 3150, -75),
    (8.6, .03, 3000, 2900, -71),
]


def bird():
    on = np.arange(N) > PEEP[0][0] * SR
    peep = np.sin(2 * np.pi * np.cumsum(column(PEEP, 1)) / SR)
    out = on * ratio(column(PEEP, 2)) * peep * sides(5.5)[:, None]
    fuzz = rng.standard_normal((len(NOTES), 2, 2 * SR))
    for (s, length, from_hz, to_hz, db), air in zip(NOTES, fuzz):
        count = round(length * SR)
        note = evened(resonate(air[:, :count], np.linspace(from_hz, to_hz, count), 60.))
        add(out, s, ratio(db) * np.hanning(count) * note)
    return out


# (frequency [Hz], density [dB per Hz])
WOODS = [(25, -13.5), (80, -0.5), (105, -2.5), (140, -9.5), (300, -12.5), (600, -25), (2500, -34),
         (3500, -25), (3950, -10.5), (5400, -12), (5900, -18.5), (6850, -26.5), (7200, -30), (9800, -32),
         (10600, -39.5)]
# (time [s], insects [dB], far hum [dB])
SWELL = [
    (0, -57.5, -62.5),
    (.9, -57, -66),
    (2.1, -57.5, -65),
    (3.9, -62, -60),
    (6.4, -59.5, -67),
    (7, -60, -63.5),
    (8, -59, -67.5),
    (9.4, -59, -66.5),
]
# (frequency [Hz], likeness [0 to 1])
SAME = [(60, 0.79), (200, .8), (400, 0.4), (1500, 0.44), (3000, 0.18), (15000, 0.12)]


def woods():
    frames, hz = N // 256 + 5, np.fft.rfftfreq(1024, 1 / SR)
    t = np.arange(frames) * 256 / SR
    a, b, c, d, patches = rng.standard_normal((frames, 513, 5)).T
    patches = evened(uniform_filter1d(uniform_filter1d(patches, 6, 0), 10, 1))
    s, *levels = np.transpose(SWELL)
    insects, hum = (np.interp(t, s, v - v.mean()) for v in levels)
    stir = -.5 * 4 * np.tanh(5 * (t - 2.1))
    stir += 1.8 * evened(uniform_filter1d(rng.standard_normal(frames), size=20))
    treble = 16 * np.linspace(.5, -.5, frames)
    swell_db = np.array([hum, stir, insects, treble])[np.digitize(hz, [600, 3600, 10200])]
    same = np.clip(read(SAME, hz), 0, 1)[:, None]
    lag = np.where(hz > 250, 18., 3.)
    late = np.exp(-2j * np.pi * hz * lag / SR)[:, None]
    shared, own = a + 1j * b, c + 1j * d
    z = np.array([late * shared, same * shared + np.sqrt(1 - same ** 2) * own])
    z *= ratio(read(WOODS, hz)[:, None] + 2.3 * patches + swell_db)
    return ratio(-59) * evened(signal.istft(z, nperseg=1024, noverlap=768)[1][:, :N])


def scene():
    shot = bow() + pings(TICKS, pan_db=-5.5, late_s=.0003)
    ground = leaves() + twigs()
    small = pings(PINGS, pan_db=2.0, late_s=0)
    nose = snort()
    echo = trees(ratio(-20.5) * shot + ratio(-12.5) * ground + ratio(-16) * small + ratio(-11) * nose)
    return shot + bearing(ground + small + nose) + echo + woods() + crickets() + bird()


def band_limit(x):
    return signal.sosfilt(signal.butter(12, 16100, fs=SR, output="sos"), x)


# (frequency [Hz], gain [dB])
TOP = [(20, -32.5), (48, 0.5), (8500, 2), (10500, -3), (12200, -8.5), (12900, -20), (13700, -8),
       (15600, -7), (16100, -38)]
# (frequency [Hz], left-right [dB])
PORTS = [(60, -3), (200, 1.5), (380, 5.0), (700, 1.0), (2380, 1), (4400, -13), (8120, 1), (15000, -1)]


def record(dry):
    left = colour(dry[0], lambda hz: read(TOP, hz) + 0.63 * read(PORTS, hz))
    right = colour(dry[1], lambda hz: read(TOP, hz) - 0.26 * read(PORTS, hz))
    return band_limit(np.array([left, right]))


dry = scene()
out = record(dry)
unload_wav(out)
```